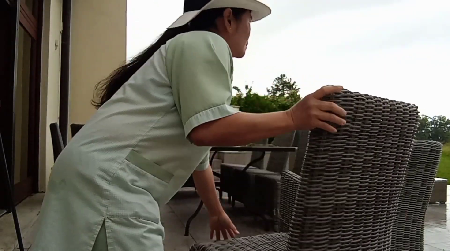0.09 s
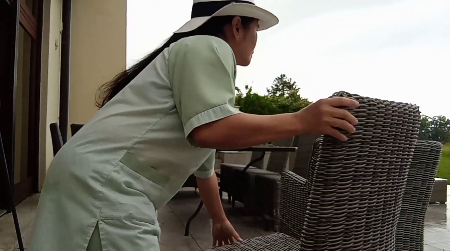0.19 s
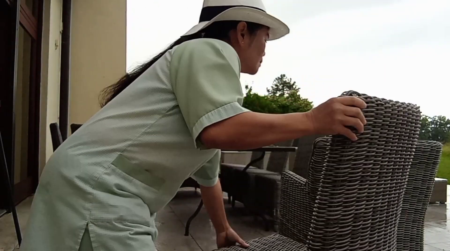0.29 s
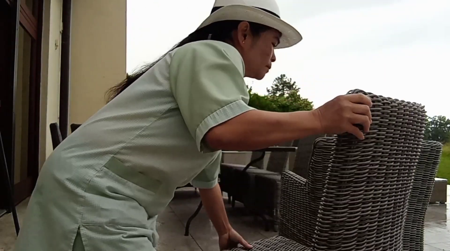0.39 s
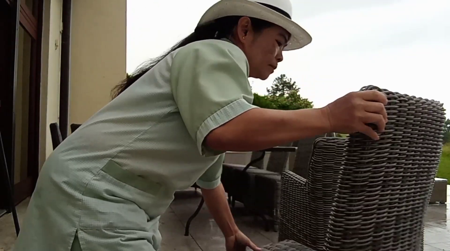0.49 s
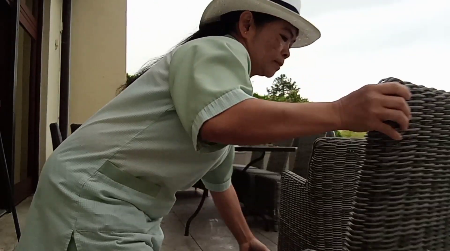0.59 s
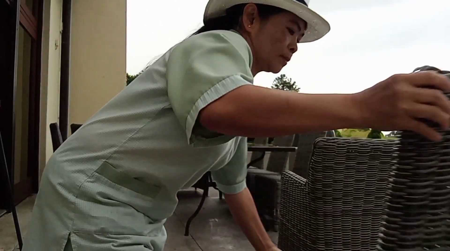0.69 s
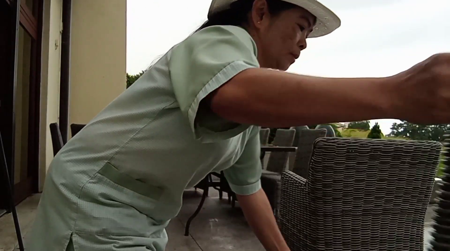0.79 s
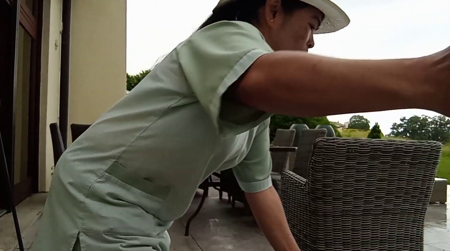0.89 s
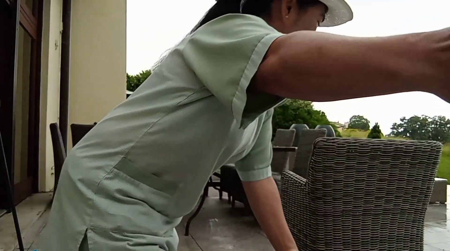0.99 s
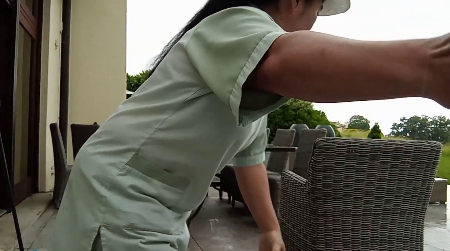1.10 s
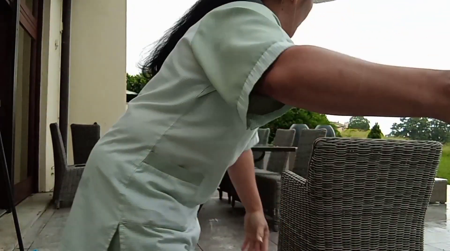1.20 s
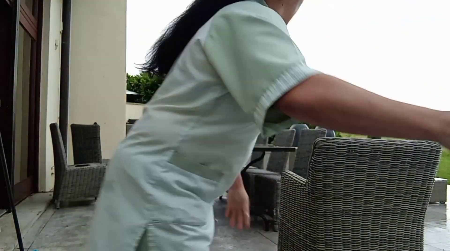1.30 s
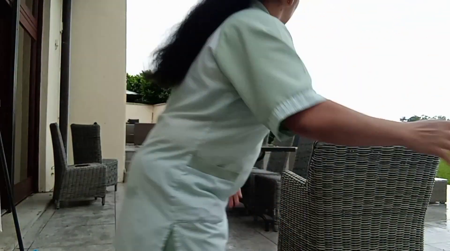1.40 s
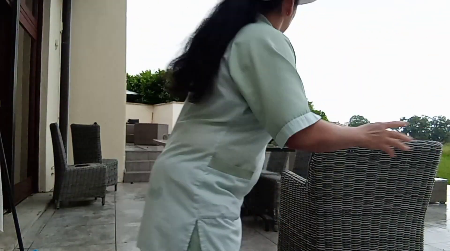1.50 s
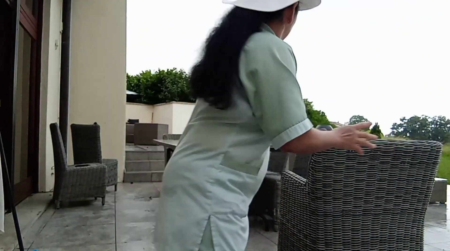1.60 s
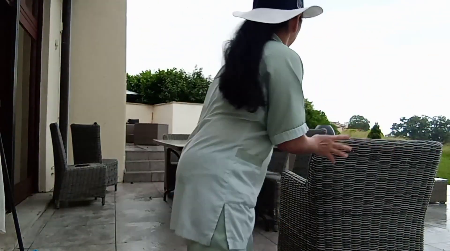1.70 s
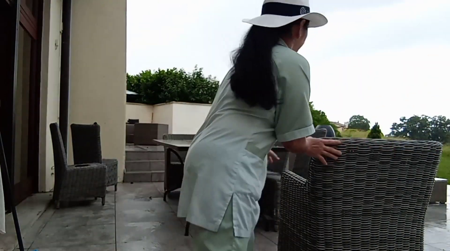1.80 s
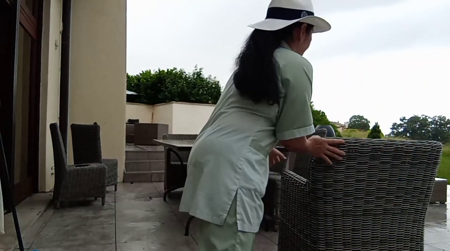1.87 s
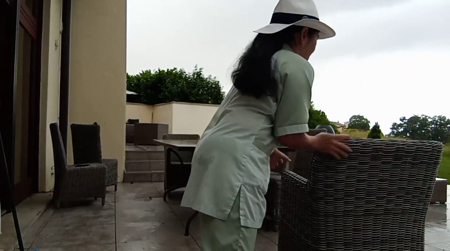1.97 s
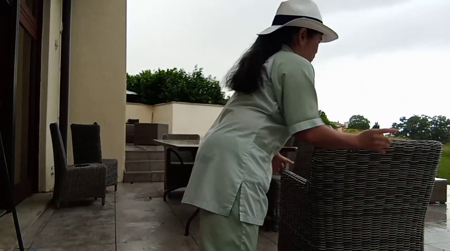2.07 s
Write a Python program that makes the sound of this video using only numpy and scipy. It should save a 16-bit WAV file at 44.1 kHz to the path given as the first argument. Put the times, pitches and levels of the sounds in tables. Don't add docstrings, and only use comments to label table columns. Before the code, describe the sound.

A wicker armchair scrapes and judders across stone terrace paving, then a faint shoe scuff

```python
import sys
import numpy as np
from scipy import signal
from scipy.fft import rfft, irfft
from scipy.io import wavfile
from scipy.ndimage import uniform_filter1d

SR = 44100
rng = np.random.default_rng(int(sys.argv[2]) if len(sys.argv) > 2 else 0)


def linear_from_db(decibels):
    return 10 ** (np.asarray(decibels, float) / 20)


def inscribe(sig):
    pcm = np.round(np.clip(np.atleast_2d(sig).T, -1, 1) * 32767)
    wavfile.write(sys.argv[1], SR, pcm.astype(np.int16))


N = 92610
T = np.arange(N) / SR

# (time [s], peak level [dB], pitch [Hz], hardness [dB])
JOLTS = [(0.011, -30, 303, 8), (0.067, -62, 305, -13), (0.093, -36, 278, -3), (0.131, -23.5, 272, 3),
         (0.176, -31, 272, -15), (0.2413, -12, 291, 4.5), (0.262, -14.5, 269, -4.5),
         (0.328, -26.5, 310, 1.5), (0.388, -34.5, 298, 8.5), (0.436, -33, 284, -14), (0.489, -17, 239, -10),
         (0.544, -19, 245, 2), (0.592, -24, 249, -19), (0.607, -11.5, 311, 5), (0.655, -15.5, 280, 1.5),
         (0.694, -19.5, 326, 5.5), (0.789, -18, 272, 6), (0.844, -8, 250, -10), (0.869, -6.5, 249, -16),
         (0.923, -10.5, 238, -15), (0.968, -16.5, 274, 13.5), (0.997, -9, 231, -24),
         (1.016, -10.5, 215, 2.5), (1.054, -10, 324, -6), (1.129, -15.5, 227, 0), (1.172, -13.5, 187, -3.5),
         (1.193, -13, 250, 3), (1.351, -31.5, 238, 8.5), (1.479, -40.5, 286, -18)]


def unit(x):
    return x / np.sqrt(np.mean(x ** 2))


def highpass(x, hz, order=4):
    return signal.sosfilt(signal.butter(order, hz, "high", fs=SR, output="sos"), x)


def curve(table):
    s, db = np.array(table).T
    return linear_from_db(np.interp(T, np.r_[s, s[-1] + .1], np.r_[db, db[-1] - 40]))


def colour(x, table):
    hz, db = np.array(table).T
    f = np.maximum(np.fft.rfftfreq(N, 1 / SR), 1)
    gain = linear_from_db(np.interp(np.log(f), np.log(hz), db))
    return irfft(rfft(x) * gain, N)


def ring(x, hz, t60):
    pole = np.exp(2j * np.pi * hz / SR - np.log(1000) / (t60 * SR))
    return signal.lfilter([1], [1, -pole], x).imag


def grains(rate, spread_db):
    when, sign, strength = rng.random((3, N))
    clicks = (when < rate / SR) * np.sign(sign - .5)
    return unit(clicks * linear_from_db(-spread_db * np.log(1 - strength)))


def walk(rate):
    k = int(SR / rate)
    held = np.repeat(rng.standard_normal(size=128)[:N // k + 1], k)
    return unit(uniform_filter1d(uniform_filter1d(held, k), k)[:N])


def burst(s, rise, fall):
    d = np.maximum(T - s, 0)
    return (1 - np.exp(-d / rise)) * np.exp(-d / fall)


def stick_slip():
    # (time [s], level [dB])
    pressure = [(0, -43.5), (.14, -36), (.2, -54), (.222, -50), (.236, -44), (.25, -26.5), (.27, -27.5),
                (.3, -52), (.46, -46), (.575, -45), (.6, -41), (.75, -26), (.85, -22.5), (1.0, -25.5),
                (1.13, -26), (1.2, -39.5), (1.28, -38.5), (1.34, -58.5)]
    push_s = 0.00026

    def soften(x):
        return signal.lfilter([1], [1, -np.exp(-1 / (push_s * SR))], x)

    slips = grains(2500, 1.5) * curve(pressure)
    rattle = rng.standard_normal(N)
    shake = sum(linear_from_db(db - 4 + hard_db) * burst(s, 0.0023, 0.0051) for s, db, hz, hard_db in JOLTS)
    return soften(slips + rattle * shake) / np.std(soften(rattle))


def frame():
    # (frequency [Hz], level [dB], decay t60 [s])
    modes = [(129, -19.5, 0.074), (152, -20, 0.068), (215, -5.5, 0.026), (245, 0, 0.11), (278, 1, 0.05),
             (328.8, -2, 0.062), (394.2, -10.5, 0.14), (464.5, -6.5, 0.055), (513, -13, 0.044),
             (643, -13.5, 0.067), (825.4, -16, 0.14), (948, -13, 0.085), (1150, -24, 0.017),
             (1580, -10.5, 0.05)]
    t60_share = .75
    push = stick_slip()
    body = 0
    for k, (hz, db, t60) in enumerate(modes):
        uneven = push * linear_from_db(2.5 * walk(25))
        mode = ring(uneven, hz, t60 * t60_share) / np.sqrt(t60 * SR)
        body = body + (-1) ** k * linear_from_db(db) * mode
    notes = 0
    for s, db, hz, hard_db in JOLTS:
        note = np.sin(2 * np.pi * hz * (T - s))
        notes = notes + linear_from_db(db - 5.5) * burst(s, 0.0026, 0.051 / np.log(1000)) * note
    return highpass(body + 2 * notes, 117.6)


def catches():
    # (time [s], peak level [dB], pitch [Hz])
    struts = [(0.217, -17, 444), (0.242, -21.5, 471), (0.542, -45, 514), (0.605, -27.5, 481),
              (0.641, -34.5, 498), (0.705, -32.5, 465), (0.732, -22.5, 479), (0.777, -26.5, 486),
              (0.802, -22, 466), (0.845, -20.5, 474), (0.9, -19, 509), (0.942, -21, 429), (0.969, -29, 406),
              (1.01, -28, 468), (1.05, -29, 443), (1.125, -24.5, 494), (1.173, -30, 415),
              (1.194, -26.5, 488)]
    # (time [s], peak level [dB], pitch [Hz])
    rails = [(0.216, -30.5, 714), (0.243, -31, 855), (0.461, -46, 764), (0.592, -26.5, 734),
             (0.609, -28, 970), (0.636, -34, 950), (0.698, -42, 780), (0.783, -40, 845), (0.879, -30, 816),
             (0.918, -32, 820), (0.953, -31.5, 833), (0.974, -34, 958), (1.003, -35, 838),
             (1.021, -34, 733), (1.065, -31.5, 859), (1.09, -33.5, 870), (1.12, -43, 736),
             (1.185, -42, 964)]
    # (time [s], peak level [dB], pitch [Hz])
    strands = [(0.2178, -35, 1690), (0.242, -42, 1590), (0.3786, -41.5, 1530), (0.5421, -42, 1695),
               (0.591, -46, 1546), (0.6063, -49, 1580), (0.6693, -48, 1530), (0.737, -40, 1468),
               (0.7516, -35, 2190), (0.7862, -33, 1484), (0.8404, -36, 1570), (0.8974, -34, 1453),
               (0.9296, -34, 1530), (0.969, -39, 1663), (1.0055, -33.5, 1620), (1.02, -37, 1440),
               (1.0553, -40, 1636), (1.0884, -45, 1580), (1.1647, -40, 1740), (1.1808, -34, 1590),
               (1.2385, -39, 1490), (1.2555, -36, 1595)]
    out = 0
    # events, level [dB], rise [s], t60 [s], roughness [0-1]
    for rows, part_db, rise, t60, rough in ((struts, 0, .006, .07, .3),
                                            (rails, 0, .005, .065, .4),
                                            (strands, -2, .005, .055, .5)):
        flutter = 1 + rough * unit(uniform_filter1d(rng.standard_normal(N), size=100))
        tones = 0
        for s, db, hz in rows:
            envelope = burst(s, rise, t60 / np.log(1000))
            tones = tones + linear_from_db(db + part_db) * 2 * envelope * np.sin(2 * np.pi * hz * (T - s))
        out = out + flutter * tones
    return out


def knock():
    # (frequency [Hz], level [dB], decay t60 [s])
    modes = [(270, -12, 0.052), (314, -18, 0.069), (471.5, -11, 0.029), (622, -20, 0.014),
             (865, -31, 0.076), (1221, -27.5, 0.021), (1490, -20, 0.0086), (2064, -19.5, 0.0074),
             (2930, -31.5, 0.0035), (3890, -33, 0.0069), (5260, -35, 0.0036), (8360, -37, 0.0107),
             (9180, -25.5, 0.0047), (14800, -33.5, 0.0038)]
    knock_s, rise_s, crack_hz, crack_s = .2168, 0.0021, 1800, 0.0022
    d = np.maximum(T - knock_s, 0)
    crack = burst(knock_s - .001, rise_s, crack_s) * rng.standard_normal(N)
    thud, bright = 0, 0
    for hz, db, t60 in modes:
        if hz < crack_hz:
            thud = thud + linear_from_db(db - 60 * d / t60) * np.sin(2 * np.pi * hz * d)
        else:
            bright = bright + linear_from_db(db) * ring(crack, hz, t60)
    thud = thud * (1 - np.exp(-d / rise_s))
    splinter = linear_from_db(-25) * signal.lfilter(*signal.butter(1, (1800, 6500), "band", fs=SR), crack)
    return 2 * splinter + 2 * thud + 0.3 * bright


def gritty(patch_db):
    # (frequency [Hz], level [dB])
    stone = [(300, -0.5), (700, 1.5), (1700, -10), (2400, -12), (5900, -20.5), (7000, -33.5), (9200, -42),
             (13500, -54)]
    # (frequency [Hz], width [Hz], level [dB])
    weave = [(1390, 880, 13), (1790, 87, -10), (2167, 80, 9.5), (2590, 187, -14), (2780, 590, -2),
             (3716, 170, 3.5), (4077, 126, 3.5), (4820, 430, -1.5), (5510, 490, -1.5), (9110, 2000, -6.5),
             (16600, 2840, -3.5)]

    def patchy_grains():
        return grains(5000, 2.5) * linear_from_db(patch_db * walk(29.9))

    peaks = 0
    for hz, width, db in weave:
        peak = ring(ring(patchy_grains(), hz, 2.2 / width), hz, 1.5 / width)
        peaks = peaks + linear_from_db(db) * unit(peak) * np.sqrt(width)
    x = unit(colour(patchy_grains(), stone)) + linear_from_db(-2) * unit(peaks)
    return x / np.std(highpass(x, 3000))


def swell(s, d):
    u = np.maximum(T - s, 0) / d
    return u * np.exp(-u ** 1.87)


def grinding():
    # (time [s], level [dB])
    strength = [(0, -62.5), (.15, -63.5), (.2, -63.5), (.24, -50), (.285, -63), (.315, -63), (.42, -63),
                (.53, -62), (.57, -59.5), (.59, -50), (.75, -48), (.9, -47), (1.14, -52), (1.225, -56),
                (1.27, -50.5), (1.33, -60.5), (1.38, -76)]
    return curve(strength) * linear_from_db(-1 + 1.2 * walk(39.8)) * gritty(1.8)


def crunches():
    # (time [s], peak level [dB], length [s], level of the top [dB])
    events = [(0.0094, -47, 0.0072, 7), (0.135, -42, 0.013, -7), (0.229, -44, 0.008, 5),
              (0.3276, -34, 0.0076, -8), (0.345, -52, 0.005, -6), (0.297, -51, 0.0083, -14),
              (0.369, -32, 0.0092, -2.5), (0.382, -36, 0.0085, -2), (0.393, -48, 0.012, -1),
              (0.468, -41, 0.017, -6), (0.538, -36.5, 0.017, -2), (0.578, -33.5, 0.0064, -3),
              (0.605, -29.5, 0.0094, -8), (0.659, -28, 0.0093, -7), (0.702, -64, 0.012, -1.5),
              (0.74, -26.5, 0.015, -7), (0.802, -32, 0.015, -4), (0.813, -29, 0.0089, -3),
              (0.8267, -24, 0.0046, 2.5), (0.894, -30.5, 0.019, 0.5), (0.965, -35.5, 0.0088, 5.5),
              (1.012, -33, 0.012, -5), (1.05, -31.5, 0.013, -1.5), (1.165, -32.5, 0.014, -2.5),
              (1.193, -32.5, 0.0091, 0.5), (1.239, -37, 0.0042, 10), (1.2414, -33.5, 0.0076, 12),
              (1.254, -36.5, 0.0052, 9.5), (1.2594, -28, 0.0058, 7.5), (1.268, -43, 0.0066, 15),
              (1.282, -43.5, 0.012, 6), (1.301, -44.5, 0.021, 7.5)]
    split_hz = 4700
    crunch = highpass(gritty(0.5), 2830, 2)
    low = signal.sosfiltfilt(signal.butter(4, split_hz, fs=SR, output="sos"), crunch)
    top = crunch - low
    return sum(linear_from_db(db - 12) * 2 * swell(s, d) * (low + linear_from_db(top_db) * top) for s, db, d, top_db in events)


def shoe():
    # (time [s], length [s], level [dB], share of top [0-1])
    scuffs = [
        (1.872, 0.13, -55, 0.05),
        (1.99, 0.12, -66.5, 0.4),
        (1.805, 0.22, -72, 0.36),
    ]

    def band(hz, t60):
        return unit(ring(ring(grains(12000, 1.0), hz, t60), hz, t60))

    out = 0
    for s, d, db, top in scuffs:
        u = np.clip((T - s) / d, 0, 1)
        low = band(3650, 0.0029) * 0.44 + band(4830, 0.0015) * (1 - u) + band(3000, 0.00092) * u
        high = band(9300, 0.00093) + band(15000, .002) * 1.1 + band(7300, 0.00051) * 0.44
        envelope = u ** 1.01 * (1 - u) ** 1.17 * 4
        out = out + linear_from_db(db) * envelope * (low * (1 - top) + top * high)
    return out


def wall(near):
    t60_s, delay_s = 0.32, .008
    t = T[:SR // 2]
    dull = signal.lfilter([1], [1, -.8], rng.standard_normal(len(t)))
    tail = dull * linear_from_db(-60 * t / t60_s) * (t > delay_s)
    return linear_from_db(-19) * signal.fftconvolve(near, tail / np.sqrt(np.sum(tail ** 2)))[:N]


def traffic():
    # (frequency [Hz], level [dB])
    far = [(30, -4), (90, -7), (280, -13), (550, -17), (850, -13), (2000, -22.5), (3000, -39), (6000, -59)]
    f = np.fft.rfftfreq(N, 1 / SR)
    spectrum = rfft(colour(rng.standard_normal(N), far))
    slow = walk(0.49)
    out = 0
    for hz in 30 * 2. ** np.arange(10):
        weight = np.clip(1 - np.abs(np.log2(np.maximum(f, 1) / hz)), 0, 1)
        out = out + irfft(spectrum * weight, N) * linear_from_db(.5 * slow + 1.2 * walk(8.97))
    return unit(out) * linear_from_db(-53.5)


def motor():
    # (frequency [Hz], level [dB])
    partials = [(91.5, -58), (183.0, -60.5), (274.5, -58.5), (366.1, -64)]
    turn = 2 * np.pi * np.cumsum(1 + 0.01186 * walk(13)) / SR
    return sum(linear_from_db(db + 3.7 * walk(16)) * np.sin(hz * turn) for hz, db in partials)


def scene():
    near = frame() + catches() + knock() + grinding() + crunches() + shoe()
    return (near + wall(near) + traffic() + motor())[None]


def band_limit(x):
    return signal.sosfilt(signal.butter(12, 16960, fs=SR, output="sos"), x)


def record(dry):
    mix = signal.sosfilt(signal.ellip(8, .2, 60, 15850, fs=SR, output="sos"), dry)
    mix = highpass(mix, 58, 5)
    return band_limit(mix)


dry = scene()
out = record(dry)
inscribe(out)
```